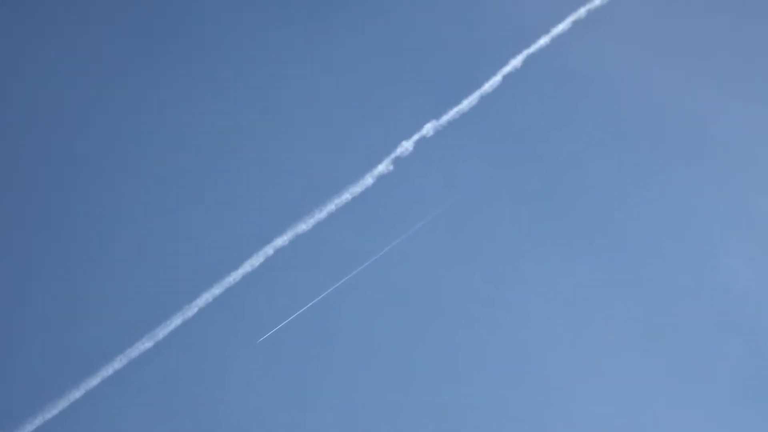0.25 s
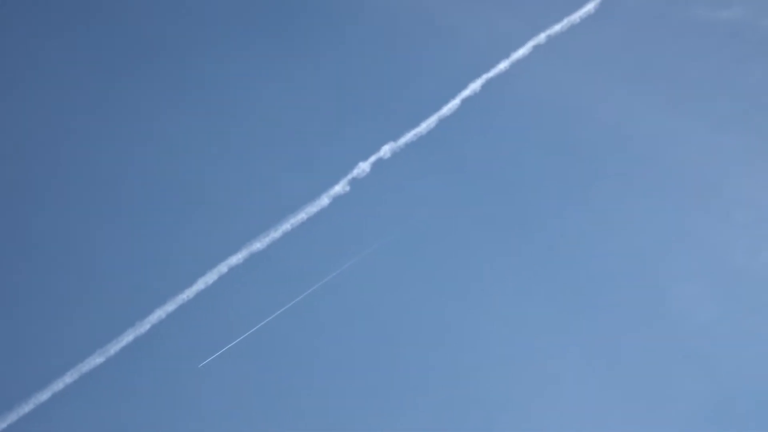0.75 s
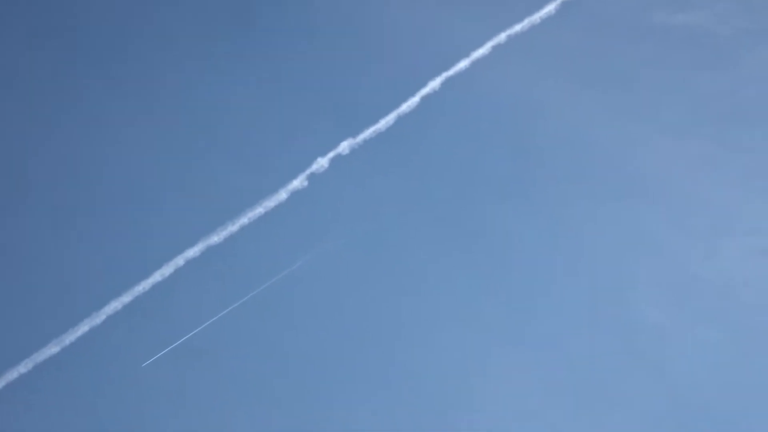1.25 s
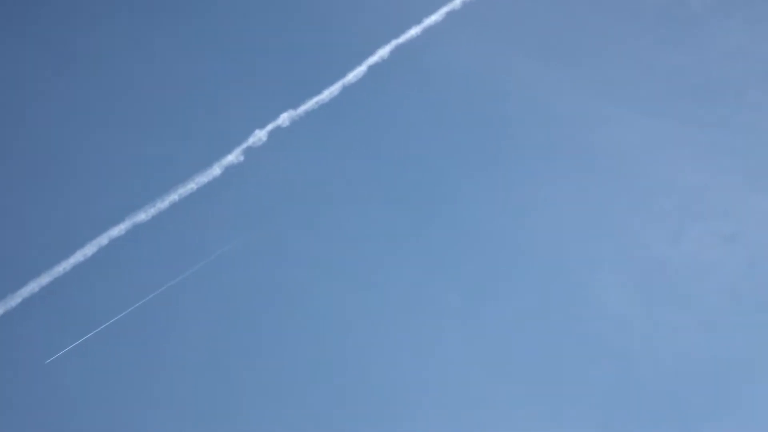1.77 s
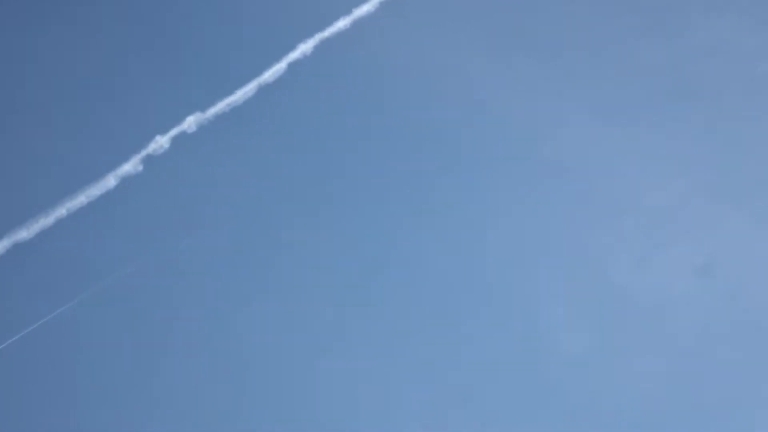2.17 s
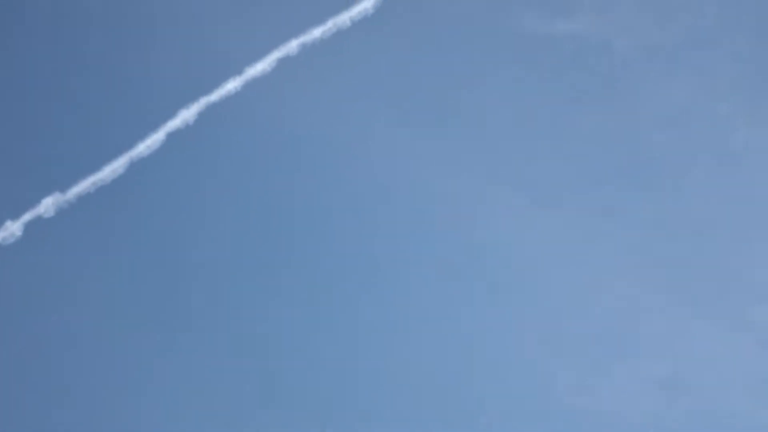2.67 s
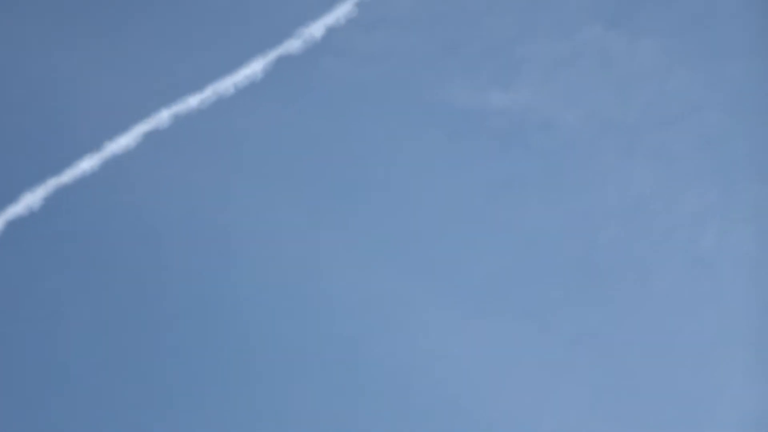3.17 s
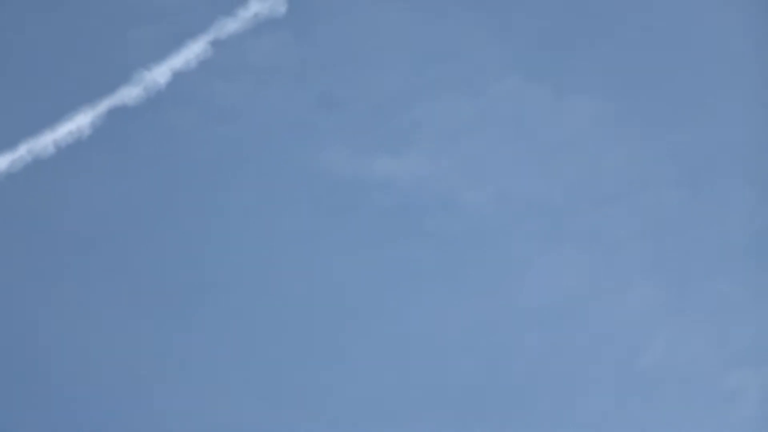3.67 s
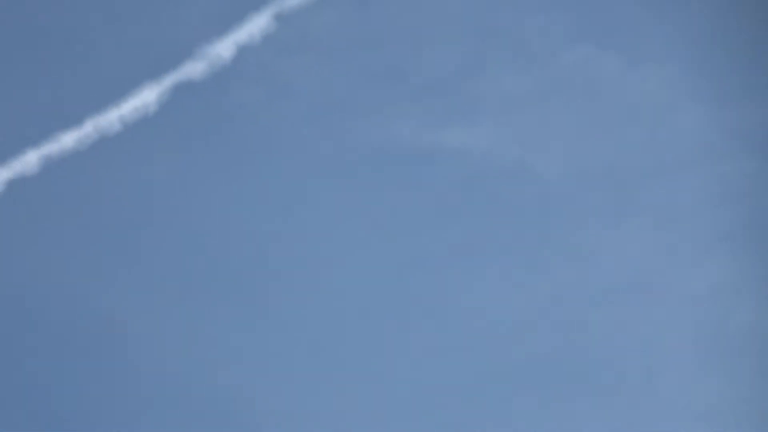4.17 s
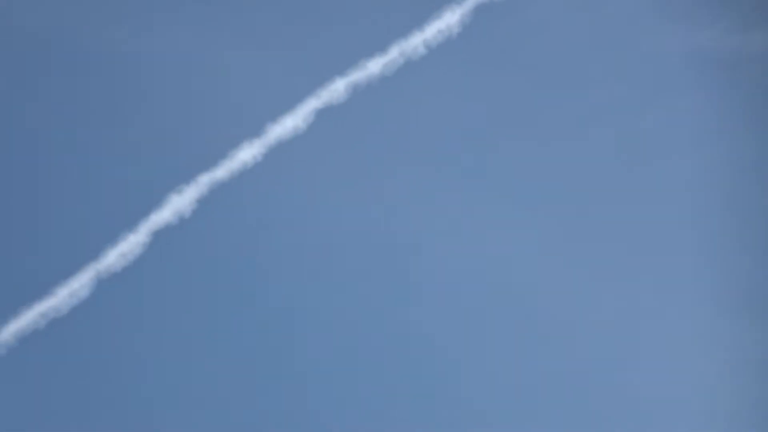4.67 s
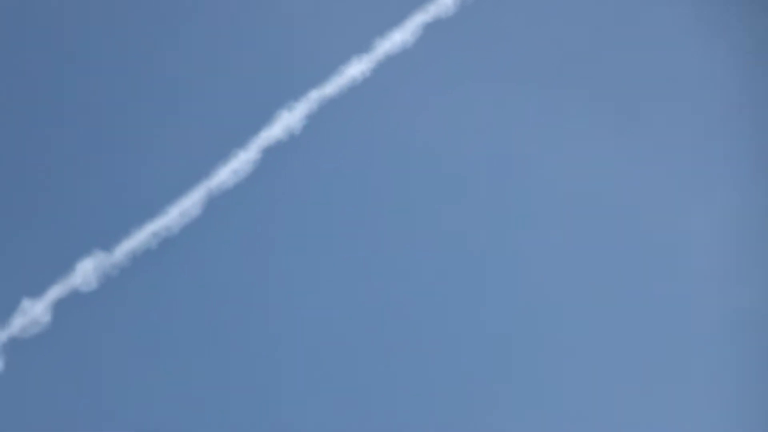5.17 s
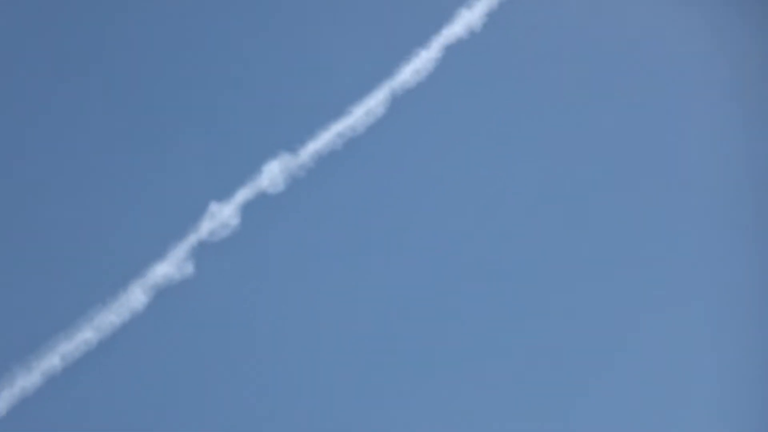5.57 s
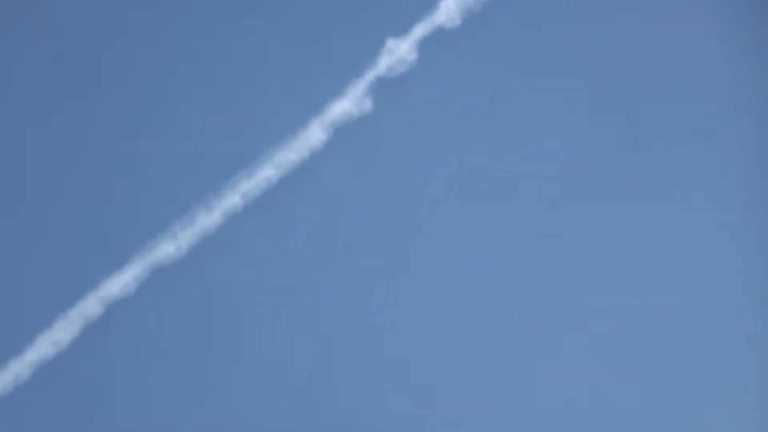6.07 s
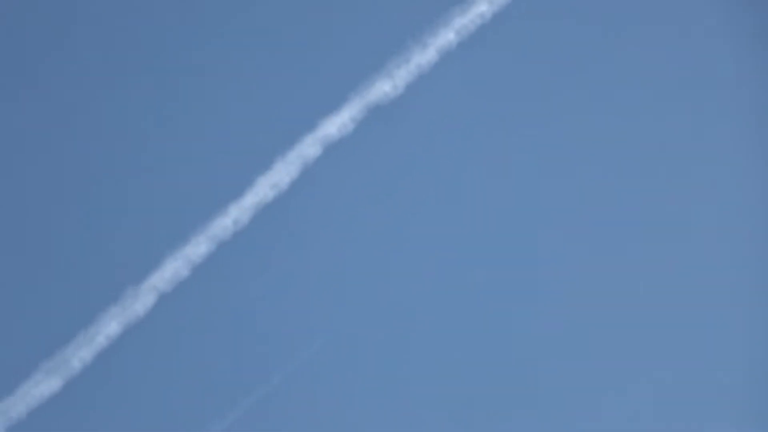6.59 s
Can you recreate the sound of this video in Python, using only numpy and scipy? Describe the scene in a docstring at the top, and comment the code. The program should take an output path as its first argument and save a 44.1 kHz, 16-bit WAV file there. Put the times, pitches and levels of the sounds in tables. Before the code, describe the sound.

Tyre roar with a faint singing tone peaks almost at once, drains away to the right into soft traffic wash, with a brief bird call later.

```python
"""By the kerb of a street, two microphone ports hear a car come up, pass about 7 m away and leave to the right.
Its tyres are shaped noise that roars, sings in two tread resonances and hisses; sine orders make the faint engine.
Short decaying sines burst in the roar and noise bursts tick as grit; it all sinks into the wash of far traffic.
Late on the treble dips, the traffic swells and a small bird calls: a buzzy gliding sine, then a lower whistle.
Its notes echo between the houses, and a far engine, one gliding tone, pulls away and changes gear."""
import sys
import numpy as np
from scipy import signal
from scipy.io import wavfile
from scipy.ndimage import uniform_filter1d, map_coordinates

SR = 44100
rng = np.random.default_rng(int(sys.argv[2]) if len(sys.argv) > 2 else 0)


def put_to_file(sound):
    """Save the sound as 16-bit audio at rate SR, in the file named by the first command-line argument."""
    columns = np.atleast_2d(sound).T  # one column per channel
    safe = np.clip(columns, -1, 1)
    whole_steps = np.round(safe * 32767)
    wavfile.write(sys.argv[1], SR, whole_steps.astype(np.int16))


N = 301196
TOP_HZ = 11050
FRAME, HOP = 2048, 512
TIME = np.arange(N) / SR
FRAME_S = np.arange(N // HOP + 2) * HOP / SR
BIN_HZ = np.maximum(np.arange(FRAME // 2 + 1) * SR / FRAME, 1)[:, None]
# the car drives straight past at a steady speed, this far from the microphone at its nearest
PASSES_S, SPEED_M_S, KERB_M = 0.53, 9.65, 6.92
# this far down the street the roar has half of its far colour; how abruptly it dulls there
FAR_M, FAR_STEEPNESS = 10, 10
# sets the stretch of road over which a beam fades
BEAM_EDGE_M = 0.59


def undb(db):
    """Decibels to gain."""
    return 10 ** (np.asarray(db) / 20)


def curves(table, times):
    """The columns of a table, joined by straight lines in time."""
    s, *columns = np.transpose(table)
    return [np.interp(times, s, c) for c in columns]


def colours(table):
    """The columns of a table, joined by straight lines over log frequency."""
    hz, *columns = np.transpose(table)
    return [np.interp(np.log(BIN_HZ), np.log(hz), c) for c in columns]


def walk(rate, times):
    """Smooth chance of spread about 1 that turns about rate times per unit of its axis."""
    steps = rng.standard_normal(2048)
    return 1.33 * map_coordinates(steps, [times * rate], order=3, mode="wrap")


def flutter(rate, count=12):
    """Unrelated walks for neighbouring bands, blended over frequency."""
    octave_share = np.log(np.maximum(BIN_HZ, 100) / 100) / np.log(TOP_HZ / 100)
    place = octave_share * (count - 1)
    weights = np.maximum(1 - abs(place - np.arange(count)), 0)
    return weights @ np.array([walk(rate, FRAME_S) for _ in range(count)])


def ripple(spacing_hz=70, drift=0.021):
    """Many reflections carve fine peaks and dips, which slide over time."""
    slid_hz = BIN_HZ * (1 - drift * FRAME_S)
    return walk(1 / spacing_hz, slid_hz.ravel()).reshape(len(BIN_HZ), -1)


def at_level(shape_db, level_db, band):
    """Gains of a moving spectrum whose power inside the band follows the level."""
    gain = undb(shape_db)
    inside = (BIN_HZ >= band[0]) & (BIN_HZ <= band[1])
    return gain * undb(level_db) / np.sqrt(np.sum(inside * gain ** 2, axis=0))


def along(times):
    """Metres that the car has gone beyond its nearest point."""
    return SPEED_M_S * (times - PASSES_S)


def bearing(metres):
    """Sine of the angle to the car: -1 coming, 0 abeam, 1 going away."""
    return metres / np.hypot(metres, KERB_M)


def far_share():
    """Share of the far colour, 0-1: it takes over as the car rolls down the street."""
    return 1 - 1 / (1 + (np.maximum(along(FRAME_S), 0) / FAR_M) ** FAR_STEEPNESS)


def off_beam(edge_m):
    """0 while a beam points at the microphone, 1 once the car is well past the beam's edge."""
    return (1 + np.tanh((along(FRAME_S) - edge_m) / (2 * BEAM_EDGE_M))) / 2


def swell(times, peak_db, falloff, street_db, late_s=0, breadth=1):
    """Level in dB of a passing source: a power of the distance, over the wash that stays in the street."""
    distance = np.hypot(1, along(times - late_s) / (breadth * KERB_M))
    return 20 * np.log10(np.hypot(undb(peak_db) / distance ** falloff, undb(street_db)))


def treble_dip(dip_s=3.74, length_s=0.1, depth_db=-7, above_hz=3900):
    """Gain of the treble, which dips briefly."""
    dip = np.exp(-(2 * (FRAME_S - dip_s) / length_s) ** 2)
    return undb(depth_db * dip / (1 + (above_hz / BIN_HZ) ** 8))


def reflections(lag_ms=1.11, comb_db=2.0, until_m=0.6):
    """Gain of the treble: combed by a reflection while the car comes up, hollowed as it leaves."""
    # a hollow in the treble slides down behind the car: time_s, centre_hz, strength (0-1)
    hollow = [(1.4, 5100, 0), (1.9, 4900, 0.5), (2.4, 4700, 0.1), (2.9, 4470, 1), (3.5, 4350, 1),
              (3.8, 4300, 0)]
    # its shoulder and its two troughs: multiple of the centre, width_hz, height_db
    hollow_shape = [(0.83, 330, 2.5), (1, 430, -5.5), (1.79, 450, -2.5)]
    treble = 1 / (1 + (1900 / BIN_HZ) ** 8)
    comb = np.cos(2 * np.pi * BIN_HZ * lag_ms / 10 ** 3)
    db = -comb_db * treble * (1 - off_beam(until_m)) * comb
    hz, strength = curves(hollow, FRAME_S)
    for multiple, width, height_db in hollow_shape:
        db = db + strength * height_db * np.exp(-((BIN_HZ - multiple * hz) / width) ** 2)
    return undb(db)


def rush(gain, port_lag_ms=0.089, facing_s=0.27):
    """Moving noise at two ports: mostly alike in the bass, apart in the top, parted by level and lag."""
    # the microphone ports: centre_hz, likeness (0-1), share of the level difference, share of the lag
    ports_table = [(40, 0.4, 0, 0), (110, 1, 0.095, 0.5), (398, 0.97, 0.25, 0.1), (800, 0.94, 0.53, 0.6),
                   (1190, 0.97, 1.32, 1.24), (1450, 0.92, 1.14, -1.93), (2180, 0.58, 1.04, 0.22),
                   (2700, 0.55, 0.38, 0.53), (3570, 0.65, 1.27, 1.12), (5430, 0.48, 0.076, 1.14),
                   (8600, 0, -0.24, 0.98), (10400, 0, 0.82, 1.95)]
    # balance of the street sound: time_s, left_minus_right_db
    pan = [(0, 1), (0.65, -2), (1.4, -7.5), (2.4, -4.5), (3.3, -5.5), (4.8, -3), (6.8, -4.5)]
    likeness, shade, late = colours(ports_table)
    likeness = np.clip(likeness, 0, 1)
    pan_db = curves(pan, FRAME_S)[0]
    # the lag crosses zero a little before the car is nearest
    lag_ms = port_lag_ms * bearing(SPEED_M_S * (FRAME_S - facing_s))
    noise = signal.stft(rng.standard_normal((2, N + 2 * HOP)), nperseg=FRAME, noverlap=FRAME - HOP)[2]
    mid, side = noise[:, :, :len(FRAME_S)] * np.sqrt([(1 + likeness) / 2, (1 - likeness) / 2])
    # each port takes half of the level difference and half of the lag
    turn = np.exp(-1j * np.pi * BIN_HZ * late * lag_ms / 1000)
    left = undb(shade * pan_db / 2) * turn
    ports = np.array([(mid + side) * left, (mid - side) / left])
    ports = ports * gain * reflections() * treble_dip()
    return signal.istft(ports, nperseg=FRAME, noverlap=FRAME - HOP)[1][:, :N] * np.sqrt(FRAME / 2)


def tone(table, wobble, waver_db, rate):
    """A wavering tone that follows a curve of pitch and level."""
    hz, db = curves(table, TIME)
    turns = np.cumsum(hz * (1 + wobble * walk(rate, TIME))) / SR
    return undb(db + waver_db * walk(rate, TIME)) * np.sqrt(2) * np.sin(2 * np.pi * turns)


def traffic(flutter_db=1.0):
    """Other cars streets away: a low drone under a soft wash."""
    # colour of the far traffic: frequency_hz, relative level_db per Hz
    town = [(25, -42), (55, -36), (80, -13.5), (120, -23), (170, -4.5), (240, -7), (400, -22), (900, 4.5),
            (1600, 4.5), (2400, -7.5), (3300, -10.5), (4500, -14.5), (5600, -19), (6600, -28.5),
            (11000, -37.5)]
    # its course: time_s, level_db, treble_db
    course = [(0, -55, -2), (3.76, -53.5, -9), (3.9, -46, -1), (4.4, -47.5, -5), (4.85, -47, -7),
              (5.4, -48, -0.5), (6.83, -48.5, 1)]
    level_db, treble_db = curves(course, FRAME_S)
    treble = 1 / (1 + (1400 / BIN_HZ) ** 8)
    gain = at_level(colours(town)[0] + treble * treble_db, level_db, band=(100, 5000))
    return rush(gain * undb(flutter_db * flutter(7.8)))


def far_engine():
    """One wavering tone climbs as a far engine pulls away, then drops as it changes gear."""
    # time_s, pitch_hz, level_db
    pull = [(4.5, 158, -100), (4.7, 160, -71), (4.88, 165, -65), (5.1, 178, -71), (5.4, 185, -68),
            (5.75, 190, -76), (6.05, 198, -68), (6.2, 174, -71), (6.35, 173, -68), (6.8, 180, -76)]
    return tone(pull, wobble=0.0099, waver_db=2.5, rate=12)


def echoes(x, t60):
    """A diffuse tail from the house fronts, different at each port."""
    decay = np.exp(-np.log(1000) * TIME[:SR] / t60)
    onset = 1 - np.exp(-TIME[:SR] / 0.027)
    tail = rng.standard_normal((2, SR)) * decay * onset
    return signal.fftconvolve(x[None], tail / np.sqrt(np.sum(tail ** 2) / 2), axes=1)[:, :N]


def bird(call_db=-47.5, trill_hz=82, waver_hz=24, waver_db=1.0, echo_db=-9.0, t60=1.6):
    """A buzzy high note and a clear lower one, both gliding sines; the street rings on softly."""
    # the buzzy first note: time_s, pitch_hz, trill_depth_hz, relative level_db
    buzz = [(3.778, 3780, 150, -22), (3.79, 3860, 110, -6), (3.81, 3930, 180, -5), (3.832, 3890, 170, -3),
            (3.85, 3880, 40, -1), (3.88, 3850, 20, 1), (3.893, 3700, 0, -3), (3.901, 3660, 0, -25)]
    # the second flicks up, steps down to a clear whistle and lifts as it thins: columns as above
    whistle = [(3.936, 3950, 0, -20), (3.942, 4200, 0, -7), (3.949, 4600, 0, -16), (3.953, 3880, 0, -1),
               (3.964, 3680, 110, -4), (3.969, 3290, 0, 0), (4.018, 3230, 20, 0), (4.03, 3120, 40, 0),
               (4.076, 3130, 10, 1), (4.09, 3110, 0, -8), (4.135, 3310, 0, -7), (4.22, 3290, 0, -19)]
    call = 0
    for note in (buzz, whistle):
        pitch, depth, db = curves(note, TIME)
        start, end = note[0][0], note[-1][0]
        trill = np.sin(2 * np.pi * trill_hz * (TIME - start)) + 0.6 * walk(300, TIME)
        hz = pitch + depth * trill + waver_hz * walk(140, TIME)
        sounding = (TIME > start) * (TIME < end)
        size = undb(call_db + db + waver_db * walk(120, TIME)) * sounding
        call = call + size * np.exp(2j * np.pi * np.cumsum(hz) / SR)
    # the right port hears the call turned in phase
    ports = np.imag([call, call * np.exp(1j * 1.72)])
    return ports + undb(echo_db) * echoes(ports[0], t60)


def engine(crank_hz=48.88, sag_hz=0.3, waver_db=2.2, wobble=0.00407):
    """Crank orders and belt-driven parts hum and sink a little as the car passes; the third carries furthest."""
    # multiple of the crank rate, relative level_db, power of the distance by which it fades
    orders = [(1, -20, 3), (2, 0, 2.4), (3, 1.5, 1.44), (4, 1, 1.56), (4.26, 8, 3.6), (4.76, 3, 1.8),
              (6.68, 11.5, 1.8), (10.98, 11, 3.5)]
    hz = crank_hz - sag_hz * bearing(along(TIME))
    hum = 0
    for multiple, db, falloff in orders:
        level_db = swell(TIME, peak_db=-59.0, falloff=falloff, street_db=-90)
        turns = np.cumsum(hz * (1 + wobble * walk(10, TIME))) / SR + rng.random()
        size = undb(level_db + db + waver_db * walk(4.87, TIME))
        hum = hum + size * np.sin(2 * np.pi * multiple * turns)
    return np.sqrt(2) * hum


def rumble(flutter_db=-0.67):
    """The car's body rumbles low on the rough road; far away the sound tilts towards the bass."""
    # body colour: frequency_hz, relative level_db per Hz
    body = [(25, -66), (60, -45), (100, -26), (135, -18), (175, -5.5), (220, -2.5), (310, 6.5), (420, -5.5),
            (700, -29), (2000, -58)]
    level_db = swell(FRAME_S, peak_db=-38.5, falloff=1.53, street_db=-62.5, late_s=0.11, breadth=0.76)
    shape = colours(body)[0] - 1.2 * far_share() * np.log2(BIN_HZ)
    gain = at_level(shape, level_db, band=(110, 380))
    return rush(gain * undb(flutter_db * flutter(4.08)))


def ticks(width_hz=3000):
    """Grit flicked from the tread ticks on the road: a short, bright burst of noise for each bit."""
    # start_s, level_db of the burst before doubling and filtering, centre_hz, decay_s
    grit_bits = [(0.974, -27.5, 9300, 0.0024), (1.304, -33, 6600, 0.002), (1.477, -26.5, 7700, 0.0013)]
    out = 0
    for s, db, hz, decay in grit_bits:
        size = undb(db) * (TIME >= s) * np.exp(-abs(TIME - s) / decay)
        edges = [hz - width_hz / 2, hz + width_hz / 2]
        bright = signal.butter(2, edges, "bandpass", fs=SR, output="sos")
        out = out + signal.sosfilt(bright, 2 * size * rng.standard_normal((2, N)))
    return out


def roar_bursts(rise_s=0.0043):
    """Brief bursts in the tyre roar near 750-880 Hz: each a short swelling, decaying sine."""
    # start_s, peak level_db, pitch_hz
    bursts = [(0.639, -18, 789), (0.789, -21, 786), (0.893, -22, 799), (0.941, -21, 880), (1.066, -18, 748),
              (1.164, -23, 869)]
    out = 0
    for s, db, hz in bursts:
        age = np.maximum(TIME - s, 0)
        size = (age / rise_s * np.exp(1 - age / rise_s)) ** 2
        out = out + undb(db) * size * np.sin(2 * np.pi * (hz * age + rng.random()))
    return out


def tyre_hiss(flutter_db=0.35, surge_db=0.58, spray_db=1.56, grit_db=1.5, ripple_db=1.2):
    """Air and grit squeezed from the tread: a hiss that surges with the road surface and crackles finely."""
    # hiss colour: frequency_hz, relative level_db per Hz
    spray = [(1500, -11.5), (3000, -1.5), (4300, 0), (5600, 0.5), (6600, -2.5), (7400, -2), (8200, -1),
             (8700, 0.5), (9600, 0), (11000, -6)]
    # the top treble, entering from 6.5 kHz and full at 8.7 kHz: time_s, level_db relative to the rest
    fine_spray = [(0, -6.5), (0.9, -5), (1.2, -1), (1.55, 0), (1.85, -1.5), (2.65, -5.5), (3, -0.5),
                  (3.9, -2.5), (6.8, -13.5)]
    level_db = swell(FRAME_S, peak_db=-37.5, falloff=3.25, street_db=-67.0, late_s=0.13, breadth=1.335)
    # the hiss drops by 3.5 dB around 8.9 m down the street
    level_db = level_db - 3.5 * off_beam(8.9)
    flicker_db = spray_db * (1 - 0.62 * far_share()) * walk(24.06, FRAME_S)
    fine_db = curves(fine_spray, FRAME_S)[0] + flicker_db
    fine = np.clip((BIN_HZ - 6500) / 2200, 0, 1)
    shape = colours(spray)[0] + fine * fine_db + ripple_db * ripple(spacing_hz=93.3, drift=0.042)
    gain = at_level(shape, level_db, band=(4500, 7500))
    hiss = rush(gain * undb(flutter_db * flutter(15)))
    grit = uniform_filter1d(rng.standard_normal(N), size=49) * np.sqrt(49)
    return hiss * undb(surge_db * walk(28.13, TIME) + grit_db * grit)


def tread_song():
    """The tread sings in a wavering tone that swells and sinks as the car passes."""
    # time_s, pitch_hz, level_db
    song = [(0, 724, -38), (0.15, 738, -33.5), (0.27, 742, -42), (0.54, 772, -46), (0.63, 782, -31),
            (0.71, 786, -35), (0.79, 788, -29.5), (0.9, 795, -34), (0.99, 802, -45), (1.1, 802, -100)]
    return tone(song, wobble=0.0047, waver_db=2.5, rate=35)


def tread():
    """The two tread resonances in dB: both climb as the car leaves, and the upper weakens behind it."""
    # lower resonance, which broadens and climbs behind the car: time_s, centre_hz, width_hz, height_db
    lower_course = [(0, 735, 75, 4), (0.16, 760, 75, 6), (0.26, 750, 120, 2), (0.52, 770, 120, 3),
                    (0.63, 788, 75, 6), (0.85, 815, 120, 6), (1.0, 910, 190, 7), (1.16, 930, 210, 8),
                    (1.29, 985, 170, 8), (1.5, 950, 400, 0)]
    # upper resonance: its centre close by and far off, and where along the street it climbs
    near_hz, far_hz, climb_m, upper_width_hz = 1423, 1970, 4, 570
    # its height ahead and behind, and the place along the street where its beam is lost
    ahead_db, behind_db, beam_m = 6.5, 0.5, 1
    hz, width, height_db = curves(lower_course, FRAME_S)
    lower = height_db * np.exp(-2 * ((BIN_HZ - hz) / width) ** 2)
    # grooves of many lengths spread the upper resonance into a flat-topped band
    hz = np.interp(off_beam(climb_m), [0, 1], [near_hz, far_hz])
    flat_top = 1 / (1 + (2 * (BIN_HZ - hz) / upper_width_hz) ** 6)
    return lower + np.interp(off_beam(beam_m), [0, 1], [ahead_db, behind_db]) * flat_top


def boom(centre_hz=500, width_hz=194, height_db=6.5, strongest_m=7.2, stretch_m=5.3):
    """The hollow under the car in dB: it sounds out of the rear for a short stretch of road."""
    in_view = np.exp(-((along(FRAME_S) - strongest_m) / stretch_m) ** 2)
    return height_db * in_view * np.exp(-((BIN_HZ - centre_hz) / width_hz) ** 2)


def tyre_roar(flutter_db=1.0, ground_ms=1.33, comb_db=1.6, ripple_db=1.56):
    """Tread noise, duller with distance; the tyre horns beam the upper resonance ahead of the car."""
    # roar close by: frequency_hz, relative level_db per Hz
    near_colour = [(25, -72), (60, -54), (150, -30), (300, -18), (430, -5), (530, -1.5), (630, -5.5),
                   (950, -1), (1150, -4), (1300, 0), (1550, -4.5), (2050, -8), (2350, -7.5), (2800, -9.5),
                   (4100, -14), (6000, -46), (11000, -50)]
    # roar far off: frequency_hz, relative level_db per Hz
    far_colour = [(25, -66), (60, -50), (150, -46), (300, -17.5), (500, -1), (750, 1), (1000, 1),
                  (1220, -5), (1750, -1), (2300, -6.5), (2600, -10), (2850, -16.5), (3700, -24),
                  (4300, -27), (11000, -59)]
    level_db = swell(FRAME_S, peak_db=-23.0, falloff=1.561, street_db=-50.5)
    far = far_share()
    shape = (1 - far) * colours(near_colour)[0] + far * colours(far_colour)[0]
    shape = shape + tread() + boom()
    # while the car is close, the bounce off the road combs the sound
    shape = shape + comb_db * (1 - far) * np.cos(2 * np.pi * BIN_HZ * ground_ms / 10 ** 3)
    shape = shape + ripple_db * (1 - far / 2) * ripple(spacing_hz=34.8)
    gain = at_level(shape, level_db, band=(400, 2500))
    return rush(gain * undb(flutter_db * flutter(7)))


def scene():
    """The town in the distance, the bird, and the car close by."""
    town = traffic() + far_engine()
    tyres = tyre_roar() + tread_song() + roar_bursts() + tyre_hiss() + ticks()
    car = tyres + rumble() + engine()
    return town + bird() + car


def record(dry):
    """The recorder cuts the top steeply."""
    steep_cut = signal.ellip(12, .1, 80, TOP_HZ, fs=SR, output="sos")
    return signal.sosfilt(steep_cut, dry)


dry = scene()
out = record(dry)
put_to_file(out)
```